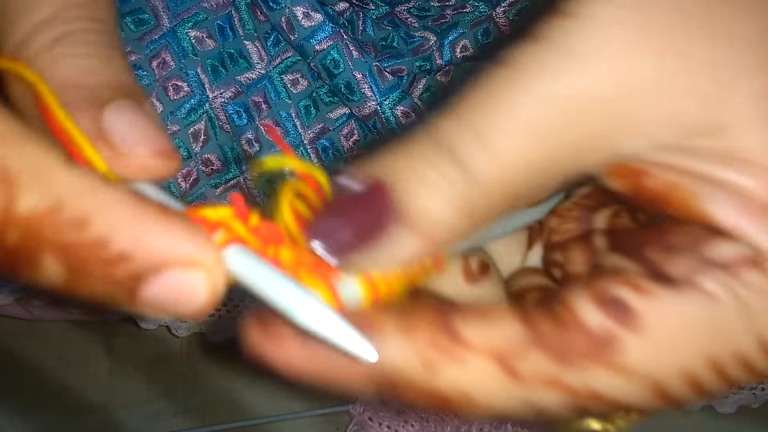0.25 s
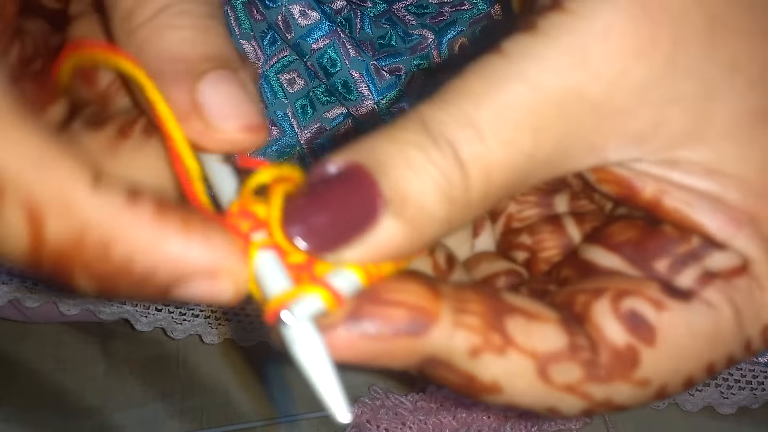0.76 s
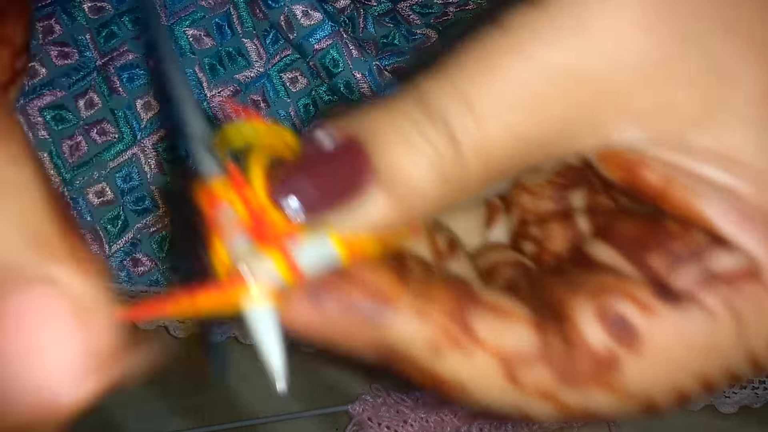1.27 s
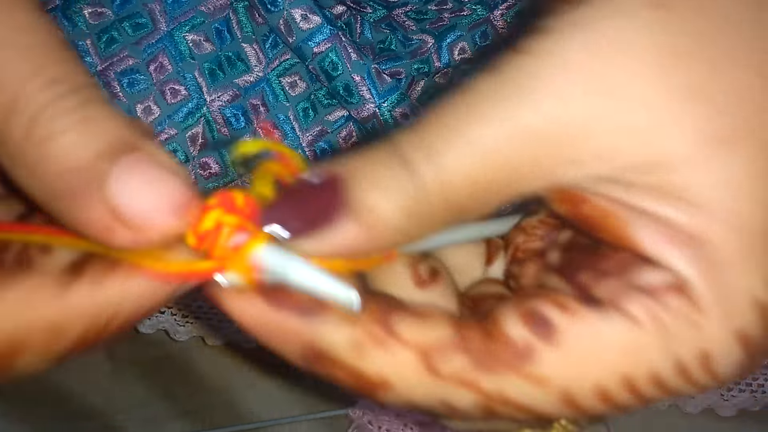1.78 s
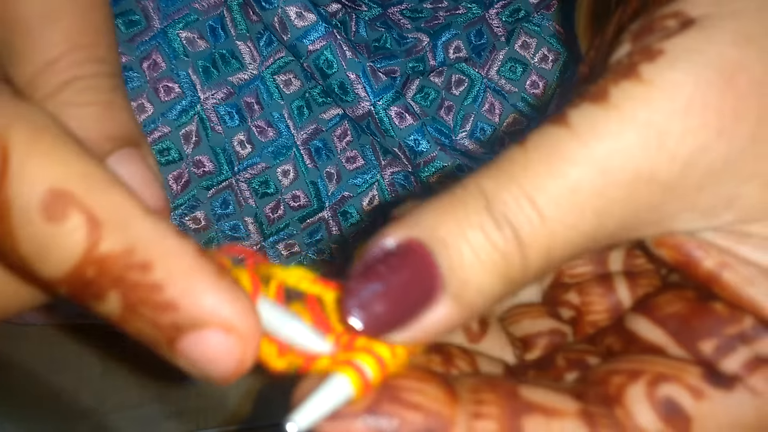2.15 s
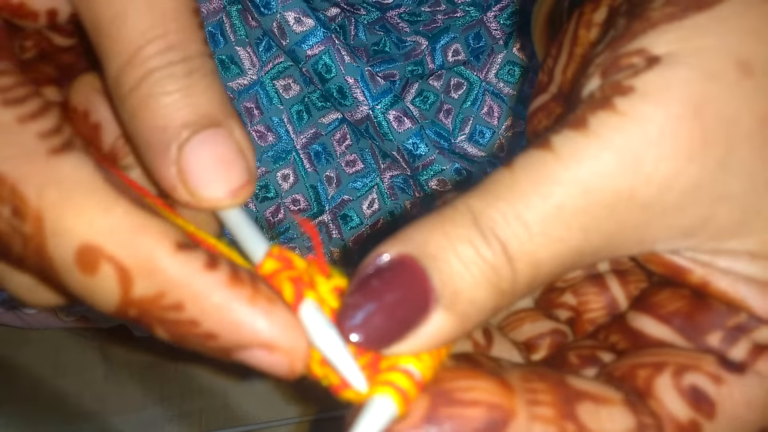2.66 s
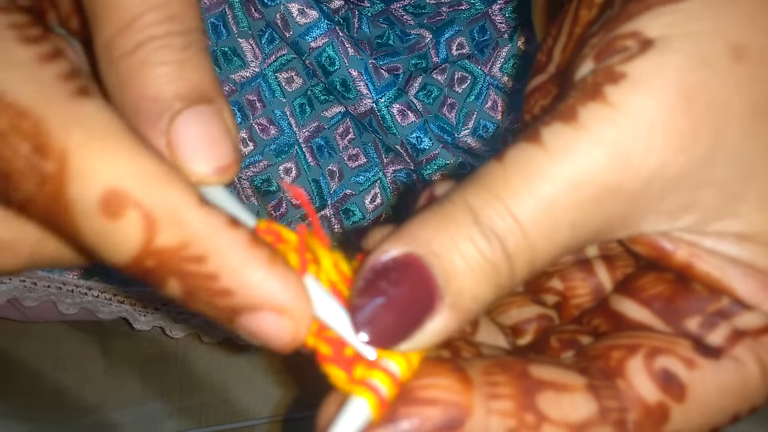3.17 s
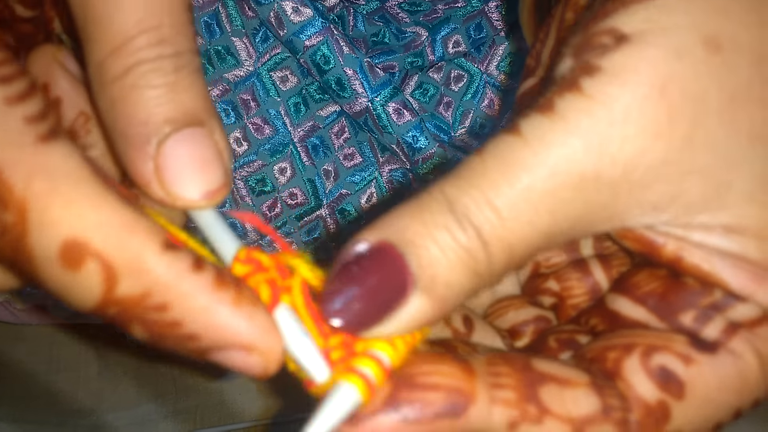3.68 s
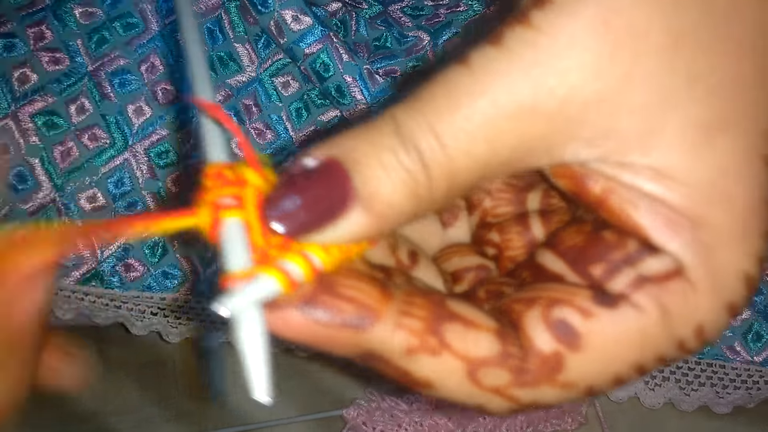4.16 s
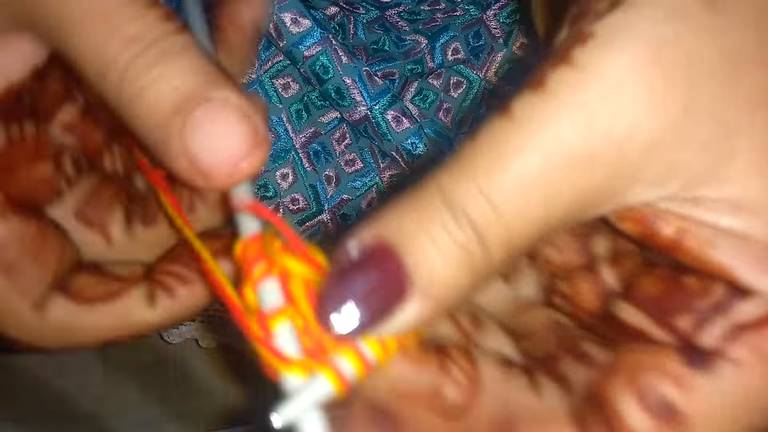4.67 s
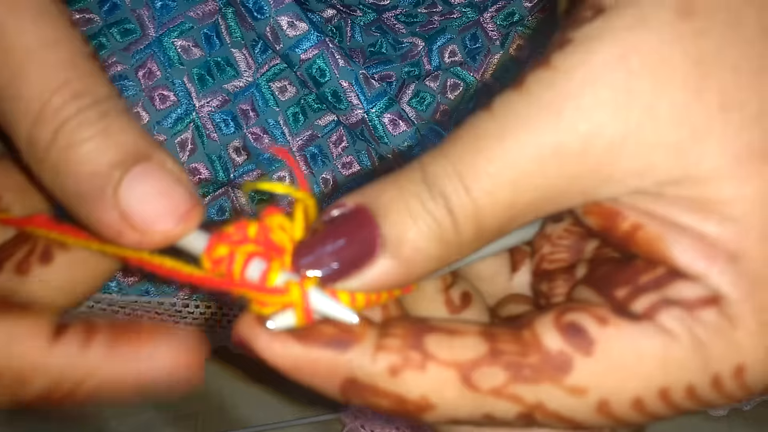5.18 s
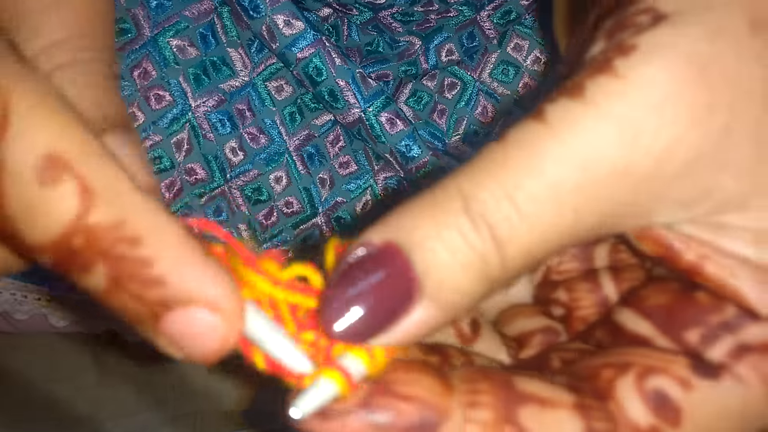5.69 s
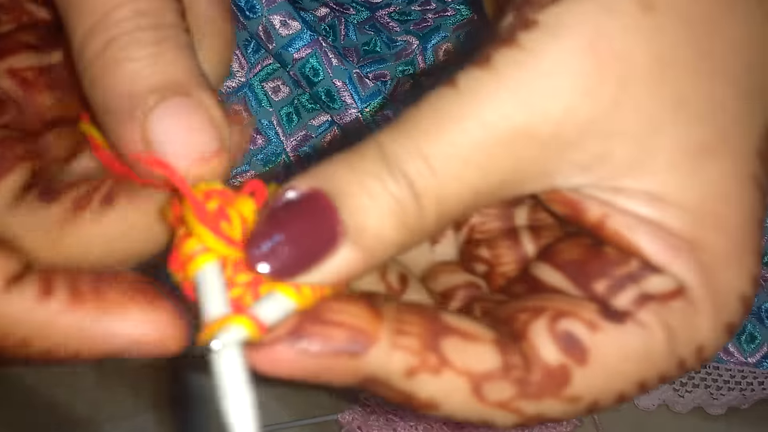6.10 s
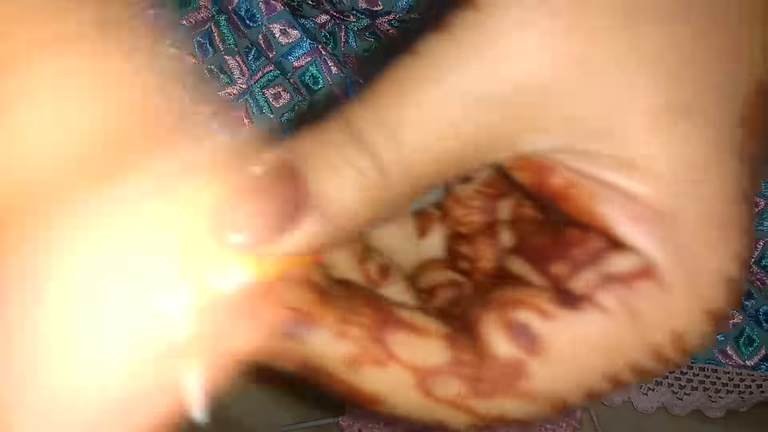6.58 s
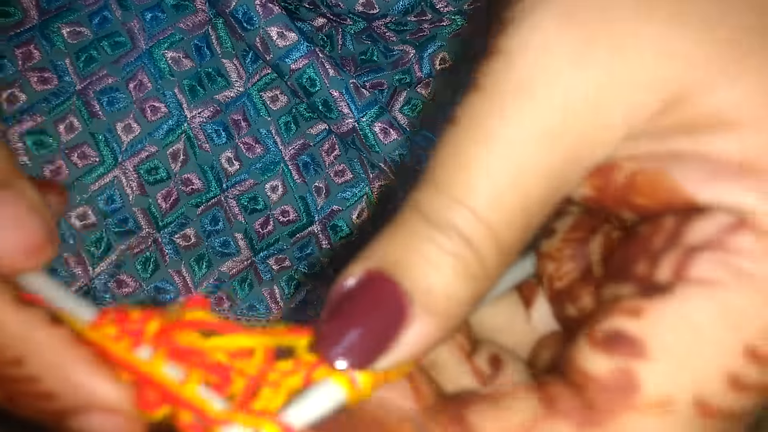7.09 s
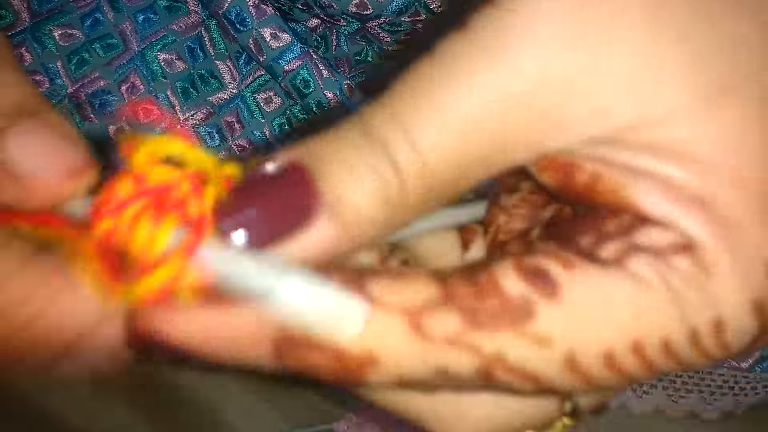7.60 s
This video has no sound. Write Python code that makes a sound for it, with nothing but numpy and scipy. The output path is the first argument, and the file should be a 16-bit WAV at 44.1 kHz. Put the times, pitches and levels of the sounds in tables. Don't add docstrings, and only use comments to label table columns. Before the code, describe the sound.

Two hollow metal knitting needles click very close to a stereo microphone in a quiet room with a far fan. Bright taps and rubbing open, then a hard slapping clack makes the room noise dip sharply and slowly return. Faint ticks and soft bumps follow, then firm taps again, a quick shaft rattle, a dense cluster of taps, and a few last light ticks. The needles sit towards the left.

```python
import sys
import numpy as np
from scipy import signal
from scipy.fft import rfft, irfft, next_fast_len
from scipy.io import wavfile

SR = 44100
rng = np.random.default_rng(int(sys.argv[2]) if len(sys.argv) > 2 else 0)


def wrap_up_sound(samples):
    columns = np.atleast_2d(samples).T
    tamed = np.clip(columns, -1, 1)
    steps = np.round(tamed * 32767).astype(np.int16)
    wavfile.write(sys.argv[1], SR, steps)


def volts(x):
    e = np.asarray(x, float) / 20
    return 10 ** e


N = 346185

# pitch in Hz, density in dB per Hz.
ROOM_AIR = [(38, -65), (46, -3), (58, -3.5), (130, 3.5), (300, -5.5), (420, -8), (700, -7.5), (1000, -14.5),
            (2000, -11), (4000, -15.5), (6000, -17), (9000, -18), (12000, -21), (15500, -25.5),
            (16200, -34)]
# pitch in Hz, level in dB re room, width in Hz.
FAN_LINES = [(129, -41, 16), (292.6, -10, 8), (595, -20, 7.2), (1165, -24.5, 8.5)]
# pitch in Hz, level in dB, width in Hz.
FAR_CLATTER = [(654, 0, 69), (1063, -1.5, 120), (245, 4, 56)]
# peak in seconds, half length in seconds, rise in dB.
CLATTER_SWELLS = [
    (3.6, 0.99, 5),
    (5.05, 0.45, 4),
    (7.45, 0.23, 1.5),
]
# peak in
# seconds, half length in seconds, pitch in Hz, width in Hz, level in dB re room.
BRIEF_DRONES = [(0.383, 0.21, 438, 11, -9), (0.94, 0.37, 720, 120, -6.5), (1.528, 0.089, 3900, 880, 7),
                (6.048, 0.042, 3160, 200, 5.5), (0.757, 0.03, 3200, 400, -1), (1.144, 0.08, 600, 67, -12),
                (3.858, 0.075, 1060, 84, -5.5), (3.925, 0.18, 677, 50, -7.5), (5.4, 0.14, 610, 19, -16),
                (1.048, .022, 6000, 900, 4), (1.048, .022, 14500, 1200, 0), (1.15, .1, 1650, 200, -9),
                (5.24, 0.072, 657, 13, -8), (6.416, 0.13, 710, 130, -9)]
# start in seconds, depth in dB.
GAIN_DUCKS = [
    (0.0, 1.6),
    (1.24, 4.4),
    (1.46, 19.28),
    (4.07, 1.15),
    (6.47, 6.5),
    (7.0, 1.3),
]
# time in seconds, rub in dB re room.
RUB_PRESSURE = [(0.0, -1), (1.14, 4), (1.35, 9), (1.45, -2), (1.57, 15), (2.1, -0.5), (2.95, -10),
                (3.34, -25), (3.93, -3.5), (4.7, 3), (5.42, -16), (5.68, -44), (5.97, 3), (6.36, 6),
                (6.54, 4), (7.06, 6), (7.85, -8)]
# start in seconds, main ring in dB, low modes in dB,
# high modes in dB, left-right difference in dB.
FIRM_TAPS = [(0.1846, -16.5, -49, -47, 12), (0.2178, -26, -46.5, -36, 19), (0.4004, -30, -42.5, -46, 12.5),
             (0.5737, -49, -36.5, -58, 13.5), (0.8859, -16.5, -44.5, -39, 7),
             (1.0344, -23.5, -43, -43, 11.5), (1.067, -17.5, -43, -33, 11), (1.1558, -17.5, -59, -43, 3.5),
             (1.236, -25, -47, -50, 8), (1.457, -15.5, -32.5, -25.5, 18.5), (3.7497, -19, -47, -34, 6),
             (4.011, -14.5, -47, -35, 10), (4.0677, -12.5, -53, -31.5, 10), (4.294, -23.5, -47.5, -48, 12),
             (4.4612, -25.5, -55, -33, 19), (4.492, -22, -53.5, -42, 23.5), (6.181, -19, -48, -42, 12.5),
             (6.2522, -14, -58, -35, 3), (6.4107, -27, -41.5, -43, 12.5), (6.435, -14.5, -50, -31, 16),
             (6.4666, -12, -44, -36, 12.5), (6.6804, -17, -65, -53, 5), (7.001, -23.5, -47.5, -47, 16.5),
             (7.147, -29, -42.5, -42, 12.5)]
# start in seconds, loss in dB, chatter in ms.
BOUNCES = [(0.1944, 4, 3.3), (0.2205, 3, 2.3), (0.2222, -0.5, 1.1), (0.226, 15, 2.6), (0.903, 5, 4.7),
           (1.04, 3, 4.4), (1.0474, 5, 8), (1.054, 9, 6), (1.071, 9, 2.3), (1.076, 8.5, 6.9),
           (1.084, 9, 2.7), (1.248, 16, 1.5), (1.251, 11.5, 3.6), (1.468, 35, 6.3), (1.482, 38, 5.8),
           (1.4966, 35, 4.5), (4.0218, 9, 11), (4.028, 11, 1.7), (4.073, 14, 2.4), (4.085, 10, 1.7),
           (4.3072, 4, 8), (4.4639, -3, 4), (4.472, 11, 4.4), (4.4782, 19, 6), (4.5009, 0, 1.8),
           (4.505, 7, 11), (6.185, 4, 6.5), (6.417, 7, 5.5), (6.4237, 0, 7), (6.43, 5, 3.2),
           (6.4393, 2, 2.3), (6.4453, 12, 2.5), (6.449, 25, 13), (6.4695, 10, 1.8), (6.477, 22, 3),
           (7.004, 4, 3.9), (7.017, 15, 8.8)]
# start in seconds, main ring in dB, high modes in dB re ring, left-right in dB.
LIGHT_TICKS = [(0.1307, -35.5, -28, 8), (0.4883, -30.5, -14, -2), (0.5287, -33, -17, -2.5),
               (1.1952, -26, -16, 6), (1.2915, -32, -12, 14.5), (1.318, -34.5, -8, 3),
               (1.666, -54, -17, -7), (1.8047, -53, -9, 7), (2.471, -46, -6, 7), (3.5228, -30, -18, -8),
               (4.09, -25, -33, 10), (4.133, -34, -21, 9), (4.172, -32, -35, 9), (4.566, -21, -32, 3),
               (4.764, -35, -17, -1.5), (5.0597, -37, -23, 19), (5.0784, -31.5, -11, 10),
               (5.205, -26.5, -18, 4), (5.554, -31, -25, -7), (5.606, -35, -10, 7), (5.682, -33, -20, 3),
               (2.899, -43, -12, -2), (6.2844, -22.5, -35, 3.5), (6.344, -26, -24, 5), (6.357, -27, -32, 5),
               (6.6301, -32.5, -26, 11), (6.851, -35.5, -23, 9), (7.0617, -32, -28, 9),
               (7.3658, -22, -7, -15), (7.5954, -31.5, -2, 10), (7.613, -35, -3, 10), (4.245, -41, -25, 3),
               (4.9087, -46, -15, 4), (4.323, -35, -20, 3), (6.5425, -48, -15, 1), (1.172, -45, -15, -1),
               (1.214, -42, -15, 2)]
# start in seconds, high modes in dB, left-right in dB.
POINT_GLANCES = [(0.8336, -39, 14), (1.031, -43, 0), (4.578, -35.5, 5), (1.4162, -41, -6),
                 (1.431, -41.5, 14), (1.5255, -43, 11), (2.029, -53, 7), (2.1028, -52, 23.5),
                 (2.1893, -56, 10), (2.2186, -44.5, 19), (2.897, -45, 8), (3.024, -43, 13),
                 (3.8621, -31.5, -9), (3.998, -30.5, 8), (5.356, -38.5, 0.5), (5.3648, -40.5, 6),
                 (6.136, -41, 0), (6.53, -38.5, 12), (6.552, -40.5, 13), (6.676, -40, 7),
                 (6.6838, -36, 21.5), (6.827, -37, 5), (6.9514, -39, 16), (7.3456, -43, 3)]
# start in seconds, low modes in dB, main ring in dB re low, left-right in dB.
SHAFT_BUMPS = [(0.567, -43.5, 10, 12), (0.675, -46.5, -3, 10), (0.692, -56, -14, -3), (0.702, -44, 6, 11),
               (0.739, -48, -8, 10), (0.7577, -43, -16, 2), (1.381, -44.5, -11, 18), (1.497, -53, 0, 16),
               (1.901, -65.5, 16.5, 6.5), (2.461, -59, 17, 7), (3.077, -54, 5, 10), (3.575, -53, -1, -3),
               (3.9389, -65, -3, -5), (4.398, -64, -8, -10), (4.789, -50, 11, 9.5), (5.5118, -57.5, 27, 2),
               (5.924, -54, 21, -0.5), (6.6365, -52.5, 25, -7), (6.706, -48, 10, 13)]
# start in seconds, low modes in dB, main ring in dB re low.
SHAFT_RATTLE = [(6.0043, -40.5, -7), (6.0095, -48, -5), (6.0185, -49, -5), (6.0282, -40, 0),
                (6.034, -43, -5), (6.0378, -43, -3), (6.0437, -47, -2), (6.05, -42, 20), (6.0525, -34, -2),
                (6.0572, -36, 3), (6.0623, -45, 5), (6.0668, -38.5, 3), (6.073, -44, -3)]
# pitch in Hz, level in dB, t60 in seconds.
LOW_TUBE_MODES = [(2990, -7, .02), (3130, -8, .025), (3450, -4, .008), (4300, -9, .02), (5400, -2, .01),
                  (6110, -10, .03), (6900, -5, .006)]
# pitch in Hz, level in dB, t60 in seconds.
MAIN_RING_MODES = [(8500, -13, .006), (8900, -13, .012), (9265, -12, .03), (9550, -1, .015),
                   (9950, -3, .008)]
# pitch in Hz, level in dB, t60 in seconds.
HIGH_TUBE_MODES = [(10600, -2, .006), (11260, -14, .04), (11505, -14, .04), (13200, -4, .02),
                   (13450, -5, .01), (14030, -7, .012), (14750, 1, .008), (12550, -1, .006)]
# low edge in Hz, high edge in Hz, level in dB.
CONTACT_SNAPS = [
    (2650, 10500, 26.5),
    (7140, 23000, -11),
    (10100, 11000, 3),
]
FAMILY_SIDES = [-6.5, 1, -3]
# start in seconds, peak in dB, pitch in Hz, t60 in seconds.
SINGING_STRIKES = [(.22, -40, 11540, 0.091), (.887, -38, 9080, 0.13), (1.2363, -22, 9480, 0.029),
                   (1.251, -34, 9230, 0.036), (2.899, -55, 11200, 0.08), (2.899, -55, 14040, .06),
                   (2.9, -51, 13200, 0.11), (2.901, -54.5, 6060, 0.046), (3.025, -59, 11300, 0.14),
                   (3.025, -53, 13300, .08), (3.078, -63, 6100, 0.084), (3.078, -56, 13300, .09),
                   (6.186, -48, 11400, 0.091), (6.532, -44, 13350, .04), (6.953, -46, 13200, .1),
                   (6.052, -46, 12400, .1), (1.432, -46, 11350, 0.17), (1.435, -52.5, 6050, 0.12),
                   (1.457, -42, 4360, 0.042), (1.4575, -35.5, 3280, .02), (1.521, -48.5, 11500, 0.15),
                   (4.012, -46, 11300, 0.097), (4.01, -48.5, 6080, 0.27), (4.462, -41, 13200, 0.088),
                   (4.462, -41, 11500, 0.083), (3.749, -43.5, 2660, 0.018), (3.863, -50, 4550, .025),
                   (6.535, -57, 4300, .05), (6.189, -47, 4390, 0.053), (6.027, -43.5, 3010, 0.096),
                   (6.053, -38, 3180, 0.081), (6.953, -41, 11560, 0.082), (7, -33, 9260, 0.13),
                   (7.059, -63, 6030, 0.059)]
# start in seconds, peak in dB, pitch in Hz, t60 in seconds.
SOFT_KNOCKS = [(1.459, -53, 1720, 0.047), (2.642, -63.5, 1230, 0.037), (3.361, -52, 1060, 0.02),
               (.6912, -46, 900, .012), (.7235, -48, 1400, .015), (.861, -53, 1110, .02),
               (3.577, -43, 1180, 0.014), (7.819, -50.5, 1340, 0.018)]
# start in seconds, peak in dB, pitch in Hz, t60 in seconds.
HAND_THUMPS = [
    (1.41, -51, 95, .1),
    (1.3, -56, 200, 0.059),
    (2.087, -63, 100, 0.04),
    (6.96, -66, 320, 0.049),
]
# pitch in Hz, gain in dB, phase in rad.
CASE_BEND = [(2510, -51, 2), (4370, -32.5, 3.8), (6950, -20, 0.44), (9730, -5.5, 1.33), (11350, -2.5, 0.74),
             (14300, 3.5, -0.035)]

PORT_LAG_S = .000392


def drift(rate):
    steps = rng.standard_normal(int(N / SR * rate) + 400)
    return np.interp(np.arange(N) / SR * rate, np.arange(len(steps)), steps)


def ring(clicks, hz, t60):
    r, w = volts(-60 / (t60 * SR)), 2 * np.pi * hz / SR
    return signal.lfilter([0, np.sin(w)], [1, -2 * r * np.cos(w), r * r], clicks + 1e-18)


def narrow_noise(white, hz, width):
    x = ring(white, hz, np.log(1000) / np.pi / width)
    return x / np.sqrt(np.mean(x ** 2) + 1e-20)


def band(x, low_hz, high_hz):
    edges = [low_hz, min(high_hz, .45 * SR)]
    return signal.sosfilt(signal.butter(2, edges, "band", fs=SR, output="sos"), x + 1e-18)


def room_level_db():
    duck_s, hold_s, recover_db_per_s, rest_db = 0.011, 0.15, 9, -55.5
    ducks = np.array(GAIN_DUCKS)
    since = np.arange(N) / SR - ducks[:, :1]
    left_db = ducks[:, 1:] - recover_db_per_s * np.maximum(since - hold_s, 0)
    return rest_db - np.max(np.maximum(left_db, 0) * np.clip(since / duck_s, 0, 1), axis=0)


def room_tone():
    t = np.arange(N) / SR
    size = next_fast_len(N)
    hz = np.maximum(np.arange(size // 2 + 1) * SR / size, 1)
    air_hz, air_db = np.transpose(ROOM_AIR)
    shape = volts(np.interp(np.log(hz), np.log(air_hz), air_db))
    air = rfft(rng.standard_normal((2, size))) * shape / np.sqrt(np.mean(shape ** 2))
    white = rng.standard_normal((2, N))
    far = sum(volts(db) * narrow_noise(white, f_hz, width) for f_hz, db, width in FAN_LINES)
    clatter = sum(volts(db + 2.1 * drift(5.8)) * narrow_noise(white, f_hz, width)
                  for f_hz, db, width in FAR_CLATTER)
    clatter_db = -17 + sum(rise_db * np.clip(1 - np.abs(t - s) / half, 0, 1)
                           for s, half, rise_db in CLATTER_SWELLS)
    far = far + volts(clatter_db) * clatter
    for s, half, f_hz, width, db in BRIEF_DRONES:
        swell = np.clip(1 - ((t - s) / half) ** 2, 0, 1)
        far = far + volts(db) * swell * narrow_noise(white[1], f_hz, width) * [[1], [.5]]
    first, second = air + rfft(far, size)
    alike = 0.21 / (1 + (hz / 667) ** 4)
    second = volts(3) * (alike * first + np.sqrt(1 - alike ** 2) * second)
    return volts(room_level_db() + 1.5) * irfft(np.array([first, second]), size)[:, :N]


def contacts():
    chatter_ms, hard_chatter_ms = 1.8, 1.3
    rows = [(*tap, hard_chatter_ms if tap[1] > -12 else chatter_ms) for tap in FIRM_TAPS]
    for s, loss_db, bounce_ms in BOUNCES:
        _, ring_db, low_db, high_db, pan_db = [tap for tap in FIRM_TAPS if tap[0] < s][-1]
        rows.append((s, ring_db - loss_db, low_db - 0.35 * loss_db, high_db - loss_db,
                     0.91 * pan_db, bounce_ms))
    rows += [(s, db, -30 + 0.56 * db, db + high, pan, chatter_ms) for s, db, high, pan in LIGHT_TICKS]
    rows += [(s, db + 9, db - 17, db, pan, chatter_ms) for s, db, pan in POINT_GLANCES]
    rows += [(s, db + main, db, db - 51, pan, 5) for s, db, main, pan in SHAFT_BUMPS]
    rows += [(s, db + main, db, db - 51, 7, 1.8) for s, db, main in SHAFT_RATTLE]
    return np.transpose(rows)


def bursts_at(times, sizes, bursts):
    train = np.zeros((2, N + bursts.shape[1]))
    for start, size, burst in zip((times * SR).astype(int), sizes.T, bursts):
        train[:, start:start + len(burst)] += size[:, None] * burst
    return train[:, :N]


def chatter_bursts(chatter_ms):
    ms = np.arange(1100) * 1000 / SR
    shape = (1 - np.exp(-ms / 0.3)) * np.exp(-ms / np.clip(chatter_ms, .1, 12)[:, None])
    bursts = shape * np.sinh(.8 * rng.standard_normal(shape.shape))
    bursts[:, 2] += 1.5 * rng.choice([-1, 1], len(bursts))
    return bursts / np.sqrt(np.sum(bursts ** 2, axis=1, keepdims=True))


def rub_grains():
    rub_db = np.interp(np.arange(N) / SR, *np.transpose(RUB_PRESSURE))
    level_db = room_level_db() + rub_db - 11.0 + 3.5 * np.clip(drift(90), -2, 1.5)
    return volts(level_db) * (rng.random(N) < 1500 / SR) * rng.standard_normal((2, N))


def needles():
    s, ring_db, low_db, high_db, pan_db, chatter_ms = contacts()
    bursts = chatter_bursts(chatter_ms)
    grains = rub_grains()
    out = volts(20.0) * band(grains, 4100, 19000)
    families = ((LOW_TUBE_MODES, low_db - 0.5, -11.0), (MAIN_RING_MODES, ring_db - 16.5, -6.0),
                (HIGH_TUBE_MODES, high_db - 8.5, -13.0))
    for (modes, touch_db, rub_db), snap, side_db in zip(families, CONTACT_SNAPS, FAMILY_SIDES):
        half_pan = (pan_db + side_db) / 2
        ports = volts(np.array([half_pan, -half_pan - 11.5]))
        low_hz, high_hz, snap_db = snap
        out += volts(snap_db) * band(bursts_at(s, ports * volts(touch_db), bursts), low_hz, high_hz)
        for hz, mode_db, t60 in modes:
            struck = volts(touch_db + mode_db + 3.0 * rng.standard_normal(len(s)))
            drive = bursts_at(s, ports * struck, bursts) + grains * volts(mode_db + rub_db)
            out += ring(drive, hz, t60)
    return out


def add(out, s, peak_db, hz, t60):
    start = int(s * SR)
    t = np.arange(min(N - start, int(.3 * SR))) / SR
    level = volts(peak_db + np.array([[2.0], [-4.0]]) - 60 * t / t60)
    out[:, start:start + len(t)] += level * np.sin(2 * np.pi * hz * t)


def singing_needles(out):
    for s, peak_db, hz, t60 in SINGING_STRIKES:
        add(out, s, peak_db - 9.5, hz * 1.002, t60)
        add(out, s, peak_db, hz, t60)


def hand_bumps(out):
    for s, peak_db, hz, t60 in list(SOFT_KNOCKS) + list(HAND_THUMPS):
        add(out, s, peak_db, hz, t60)
        add(out, s, peak_db + 5.5, hz * 1.45, t60)


def slap():
    click = np.zeros((2, N))
    click[:, int(1.4574 * SR)] = 1, .3
    return volts(-2) * band(click, 510, 5200) + volts(6.5) * band(click, 7900, 12700)


def hands():
    out = slap()
    singing_needles(out)
    hand_bumps(out)
    return out


def bend(near):
    size = next_fast_len(N)
    hz = np.arange(size // 2 + 1) * SR / size
    f_hz, gain_db, phase = np.transpose(CASE_BEND)
    first, second = rfft(near, size)
    turn = np.interp(hz, f_hz, phase) - 2 * np.pi * hz * PORT_LAG_S
    round_edge = volts(np.interp(hz, f_hz, gain_db)) * np.exp(1j * turn)
    second = second / np.sqrt(1 + (hz / 6700) ** 4) - round_edge * first
    return np.array([near[0], irfft(second, size)[:N]])


def reverberate(near):
    t = np.arange(int(.4 * SR)) / SR
    tail = rng.standard_normal((2, len(t))) * volts(-60 * t / .18) * (t > .004)
    tail = tail / np.sqrt(np.sum(tail ** 2, axis=1, keepdims=True))
    return signal.fftconvolve(near[:1], tail, axes=1)[:, :N]


def scene():
    near = needles() + hands()
    return bend(near) + volts(-13) * reverberate(near) + room_tone()


def low_pass(x):
    return signal.sosfilt(signal.butter(12, 16450, fs=SR, output="sos"), x)


def record(dry):
    size = next_fast_len(N)
    hz = np.arange(size // 2 + 1) * SR / size
    bass_hz = 587
    cross = np.sqrt((hz ** 2 + (0.4 * bass_hz) ** 2) / (hz ** 2 + bass_hz ** 2))
    cross = cross / np.sqrt(1 + (hz / 5500) ** 4)
    late = rfft(dry[::-1], size) * cross * np.exp(-1j * (2 * np.pi * hz * PORT_LAG_S + .4))
    sides = dry - volts(-1.5) * irfft(late, size)[:, :N]
    sides = signal.sosfilt(signal.butter(18, 15800, fs=SR, output="sos"), sides)
    sides = signal.sosfilt(signal.butter(4, 40, "high", fs=SR, output="sos"), sides)
    return low_pass(sides)


dry = scene()
out = record(dry)
wrap_up_sound(out)
```